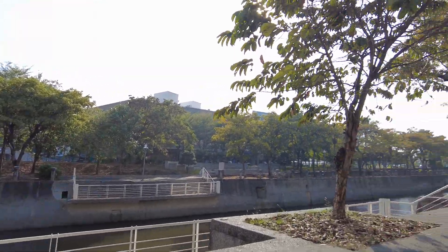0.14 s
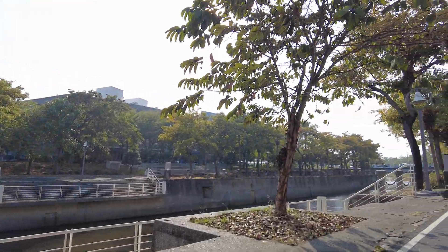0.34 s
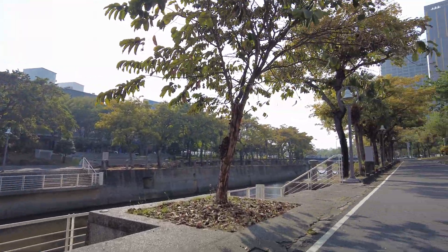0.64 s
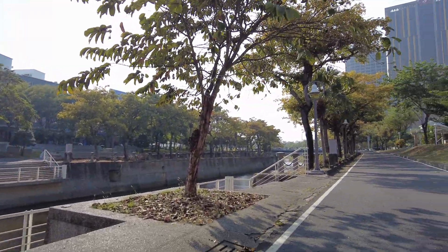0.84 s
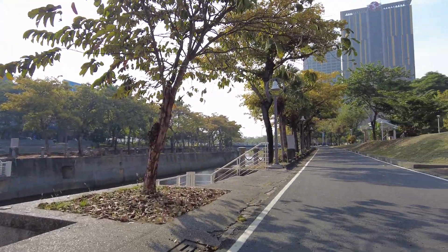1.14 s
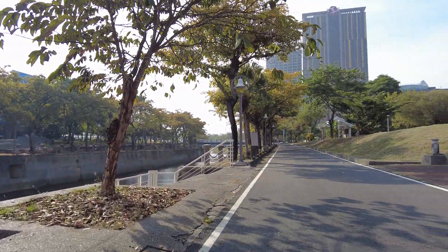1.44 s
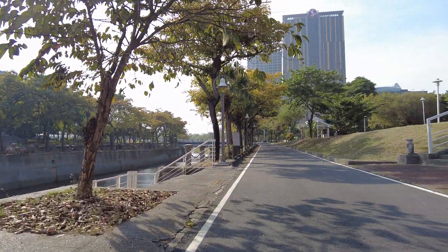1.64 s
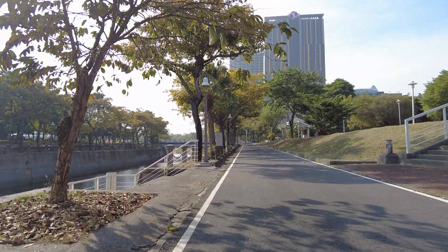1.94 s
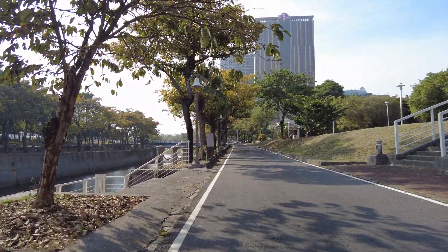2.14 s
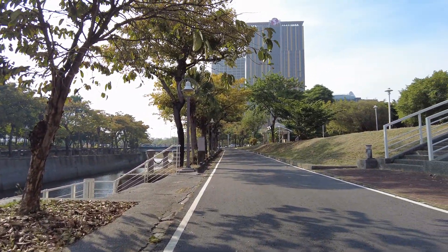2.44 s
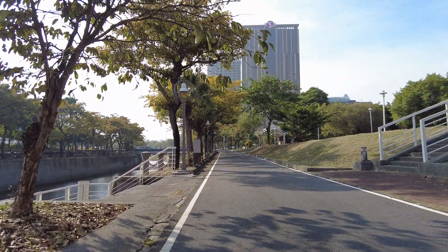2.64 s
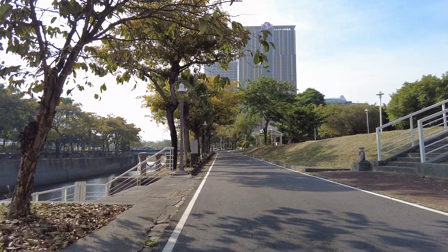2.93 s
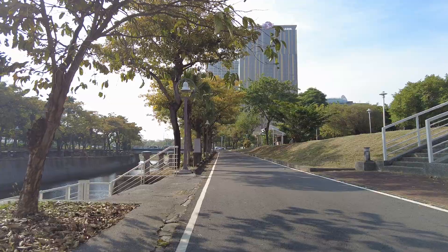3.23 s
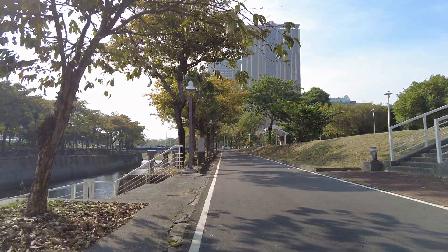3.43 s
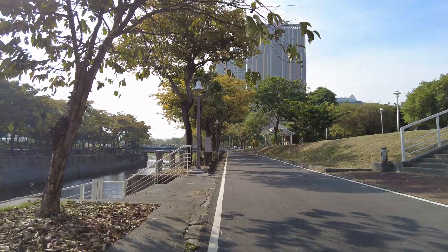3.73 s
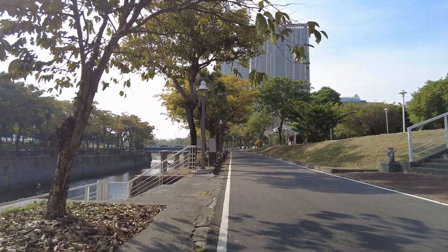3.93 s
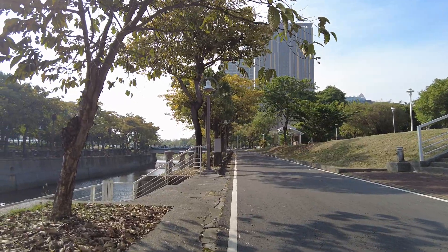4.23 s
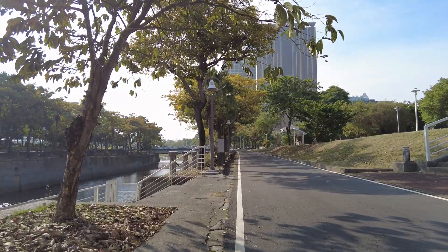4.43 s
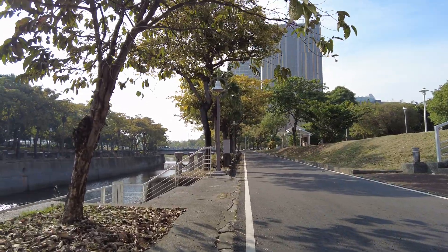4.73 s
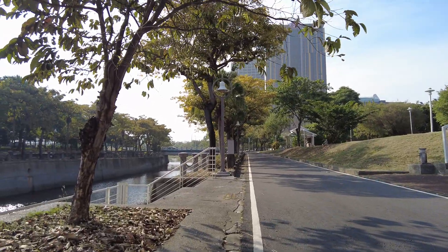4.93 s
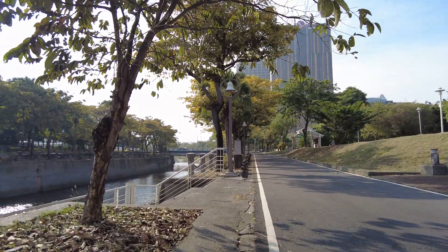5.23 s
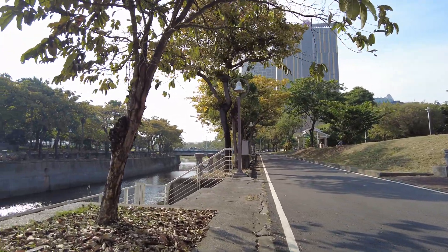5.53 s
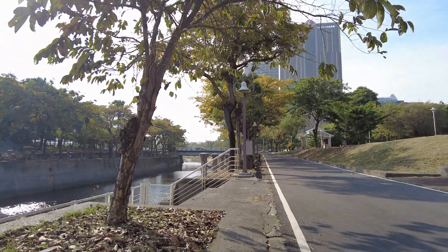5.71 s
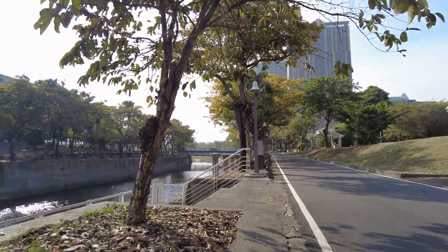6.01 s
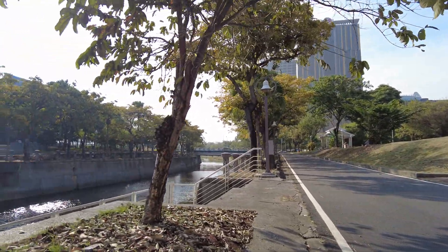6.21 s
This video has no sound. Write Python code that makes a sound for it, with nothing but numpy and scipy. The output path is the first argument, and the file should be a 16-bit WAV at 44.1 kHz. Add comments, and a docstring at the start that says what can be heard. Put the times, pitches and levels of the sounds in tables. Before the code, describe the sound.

Gusty wind rumbles and thumps on the microphone outdoors, strongest in the first second, over soft distant traffic roar and faint small bird chirps.

```python
"""A riverside path in a gusty breeze. Eddies buffet the microphone: shaped noise makes a lumpy rumble, short
swings make single thumps. Small birds chirp in the trees as gliding sines with echoes, over faint far calls.
Dry things tick and crunch nearby as decaying noise bursts. Behind lie traffic drone, rolling tyres, the roar
of the town and a hiss of leaves, each steady noise with its own spectrum and slow level curve."""
import sys
import numpy as np
from scipy import signal
from scipy.fft import rfft, irfft
from scipy.io import wavfile
from scipy.ndimage import uniform_filter1d

SR = 44100
rng = np.random.default_rng(int(sys.argv[2]) if len(sys.argv) > 2 else 0)


def waveform_to_disk(signal):
    """Save audio, clipped to [-1, 1], as 16-bit WAV at the path in sys.argv[1]."""
    frames = np.transpose(np.atleast_2d(signal))
    scaled = np.clip(frames, -1, 1) * 32767
    samples = np.round(scaled).astype(np.int16)
    wavfile.write(sys.argv[1], SR, samples)


N = 280869


def gain_of(db):
    """Decibels to amplitude gain."""
    return 10 ** (np.asarray(db) / 20)


def evened(x):
    """Scales to an rms of one."""
    return x / np.sqrt(np.mean(x ** 2) + 1e-20)


def read(points, hz):
    """Interpolates a table on a log-frequency axis."""
    f, value = np.transpose(points)
    return np.interp(np.log(hz + 1), np.log(f + 1), value)


def curve(table, count):
    """Gain along time from dB column number count."""
    rows = np.transpose(table)
    return gain_of(np.interp(np.arange(N) / SR, rows[0], rows[count]))


def add(mix, s, sound):
    """Mixes a stereo sound in at s seconds."""
    part = mix[:, round(s * SR):][:, :sound.shape[1]]
    part += sound[:, :part.shape[1]]


def noise(spectrum, patchy_db, flicker_db, size=1024):
    """Partly correlated stereo noise with drifting spectral patches and a flicker shared by all pitches."""
    # left-right correlation: (frequency [Hz], correlation [-1 to 1])
    likeness = [(40, .997), (90, .982), (170, .94), (260, .9), (430, .8), (600, .52), (775, .47), (950, .1),
                (1120, -.2), (1290, .72), (1800, .63), (2300, .27), (3000, 0), (3400, -.13), (6200, -.12),
                (9000, .05), (15000, .1)]
    # channel balance: (frequency [Hz], left over right [dB])
    balance = [(300, 0), (1120, 2.2), (1400, -.7), (5000, -1.4), (7500, .4), (11000, 1.5), (15000, .2)]
    frames, hz = 4 * N // size + 5, np.fft.rfftfreq(size, 1 / SR)
    a, b, c, d, patches = rng.standard_normal((frames, len(hz), 5), dtype=np.float32).T
    patches = uniform_filter1d(patches, size=9, axis=0)  # across frequency
    patches = evened(uniform_filter1d(patches, size=10, axis=1))  # along time
    flicker = evened(uniform_filter1d(rng.standard_normal(frames), size=4))

    same = np.clip(read(likeness, hz), -1, 1)[:, None]
    left = a + 1j * b
    right = same * left + np.sqrt(1 - same ** 2) * (c + 1j * d)
    side = gain_of(read(balance, hz) / 2)[:, None]
    level_db = read(spectrum, hz)[:, None] + patchy_db * patches + flicker_db * flicker
    z = np.array([left * side, right / side]) * gain_of(level_db)
    return evened(signal.istft(z, nperseg=size, noverlap=3 * size // 4)[1][:, :N])


def buffeting():
    """Wind pressure noise: big slow eddies make the deep rumble, small quick ones the upper rumble."""
    # wind level before the lumps: (time [s], deep rumble [dB], upper rumble [dB])
    gusts = [(0, -32, -37), (.075, -35, -35), (.26, -34, -38), (.55, -32, -40), (.74, -35, -39),
             (.81, -43, -44), (1.04, -36, -38), (1.33, -45, -43.5), (1.74, -41.5, -48.5),
             (1.87, -34, -42.5), (2.07, -42, -45), (2.33, -41.5, -47), (2.75, -39.5, -44.5),
             (2.97, -39.5, -48), (3.08, -37, -47.5), (3.36, -45, -44.5), (3.69, -37, -44.5),
             (3.8, -38, -45), (4.18, -40.5, -43), (4.6, -40.5, -46), (5.25, -43.5, -46), (5.75, -42.5, -48),
             (5.96, -42.5, -39.5), (6.37, -45.5, -48)]
    # big slow eddies: (frequency [Hz], relative density [dB per Hz])
    deep_spectrum = [(5, 1), (11, 6.5), (22, -6.5), (43, 8), (56, 4.5), (70, -3.5), (100, -32.5),
                     (200, -130)]
    # small quick eddies: (frequency [Hz], relative density [dB per Hz])
    sharp_spectrum = [(30, -60), (55, -18), (75, 7.5), (100, -1), (130, -7.5), (170, -13.5), (250, -22),
                      (500, -72), (1000, -130)]
    lumps_db, lump_s = 2, 0.014  # rms level swing, smoothing window
    deep = noise(deep_spectrum, 0.72, 0.63, size=4096)
    sharp = noise(sharp_spectrum, 1.0, 1.76, size=2048)
    window = np.hanning(round(lump_s * SR))
    lumps = evened(signal.oaconvolve(rng.standard_normal(N), window, "same"))
    rumble = curve(gusts, count=1) * deep + curve(gusts, count=2) * sharp
    return gain_of(lumps_db * lumps) * rumble


def thumps():
    """Each large eddy pushes both channels alike through a swing or two of sagging pitch."""
    # single large eddies: (middle [s], envelope peak [dB], mid pitch [Hz])
    eddies = [(0.057, -20.5, 100), (.074, -17.5, 50), (.103, -23.5, 56), (.255, -23.5, 55), (.288, -23, 48),
              (.413, -22.5, 52), (.652, -19.5, 49.7), (.685, -25, 65), (.96, -26, 62), (1.015, -24, 58),
              (1.055, -23.5, 45.2), (1.178, -27.5, 52)]
    swings, sag = 1.82, 0.24  # pitch runs from this share above to this share below its middle
    out = np.zeros((2, N))
    for (s, db, hz), phase_turns in zip(eddies, rng.random(len(eddies))):
        u = np.linspace(0, 1, round(swings / hz * SR))
        turns = swings * (u + sag * u * (1 - u)) + phase_turns
        swing = np.cos(2 * np.pi * turns) * np.sin(np.pi * u) ** 2
        add(out, s - len(u) / 2 / SR, np.array([swing, swing]) * gain_of(db))
    return out


def birds():
    """Gliding sine whistles that waver and flutter, blurred by echoes off trees and walls."""
    # clear notes: (start [s], length [s], first pitch [Hz], last pitch [Hz],
    # arch above the straight glide [Hz], level before flutter [dB])
    chirps = [(0.29, 0.055, 2584, 3160, 2, -58.5), (0.924, 0.033, 3260, 3230, 0, -60),
              (0.96, 0.041, 2335, 2290, -3, -57), (1.09, 0.039, 2630, 2790, 0, -53.5),
              (1.202, 0.12, 3180, 2990, 1.5, -64.5), (1.31, 0.022, 4800, 5700, 300, -63),
              (1.332, 0.049, 5630, 4650, 477, -62), (1.772, 0.025, 2780, 2470, 0, -49),
              (1.846, 0.043, 3600, 3760, 62, -67), (1.991, 0.03, 2740, 2525, -20, -49),
              (2.025, 0.028, 2420, 2300, 0, -61), (2.38, 0.055, 3430, 2730, 301, -60),
              (2.672, 0.034, 5390, 5280, 3, -59), (2.707, 0.035, 3040, 3150, 0, -63),
              (2.867, 0.063, 3400, 2690, 198, -62), (3.26, 0.042, 3500, 3110, -4, -62),
              (3.437, 0.072, 3190, 3130, 35, -60), (3.58, 0.035, 3200, 3080, 7, -65),
              (3.677, 0.049, 3230, 3230, 0, -68), (3.87, 0.06, 3250, 3240, -1, -66),
              (4.198, 0.046, 2910, 2614, -6, -54), (4.84, 0.027, 2530, 2140, 0, -56.5),
              (3.93, 0.07, 5400, 5200, 0, -75), (5.17, 0.09, 5190, 5100, 0, -72),
              (5.167, 0.1, 6280, 6230, 0, -74), (5.85, 0.14, 6080, 5650, 102, -74),
              (6.165, 0.027, 2560, 2400, 0, -57), (6.26, 0.042, 3750, 3110, -6, -63)]
    # hoarse, fluttering calls from further off: columns as for the chirps
    warbles = [(0.179, 0.06, 4200, 4215, -1, -61), (0.49, 0.07, 5570, 5450, 2, -69),
               (1.145, 0.051, 4700, 4900, 500, -66.5), (1.19, 0.045, 4490, 4400, 0, -65),
               (1.385, 0.028, 4800, 5300, 98, -65), (1.39, 0.09, 4270, 4180, -2, -72),
               (2.11, 0.029, 4500, 4350, 0, -67), (2.44, 0.087, 4450, 4400, 0, -69),
               (2.72, 0.099, 5400, 5500, 0, -69), (2.875, 0.045, 4400, 4450, 0, -70),
               (5.14, 0.025, 5250, 5350, 0, -69)]
    clear, hoarse = (.005, 2.6), (.028, 4.5)  # (pitch waver [share], flutter [dB])
    edge_s, arch_lean = 0.0043, 0.73  # note rise and fall; a lean below 1 peaks the arch early
    pan_db, note_rise_db = -1.5, 1  # left over right; level gained along each note
    lag_rad = 1.4  # left channel behind right
    echo_db, echo_t60_s, echo_delay_s = -6, 0.35, .008

    out = np.zeros((2, N))
    notes = [*(r + clear for r in chirps), *(r + hoarse for r in warbles + twitter())]
    for s, length_s, first_hz, last_hz, arch_hz, db, waver_share, flutter_db in notes:
        u = np.linspace(0, 1, round(length_s * SR))
        drift = uniform_filter1d(rng.standard_normal((2, len(u))), size=140, axis=1)
        waver, flutter = evened(signal.detrend(drift))
        glide_hz = first_hz + (last_hz - first_hz) * u + arch_hz * np.sin(np.pi * u ** arch_lean)
        waver_factor = 1 + waver_share * waver + .00006 * waver / length_s  # short notes waver more
        phase = 2 * np.pi * np.cumsum(glide_hz * waver_factor) / SR
        pair = np.sin(phase + np.array([[-lag_rad], [0]]))
        pair = pair * gain_of([[db + pan_db / 2], [db - pan_db / 2]])
        edges = np.clip(np.minimum(u, 1 - u) * length_s / edge_s, 0, 1)
        add(out, s, pair * gain_of(flutter_db * flutter + note_rise_db * u) * edges)

    t = np.arange(SR // 2) / SR
    echoes = rng.standard_normal((2, len(t))) * gain_of(-60 * t / echo_t60_s) * (t > echo_delay_s)
    echoes = echoes / np.linalg.norm(echoes[0])
    return out + gain_of(echo_db) * signal.fftconvolve(out, echoes, axes=1)[:, :N]


def twitter(count=130):
    """Chirp rows for a faint crowd of far birds: random moments, pitches and slides."""
    s, high, slide, loud = rng.random((count, 4)).T
    hz = 2400 * 2.4 ** high ** 1.4
    db = -65 - 9 * high - 5 * loud  # air dulls the higher calls
    return [(a * N / SR, .04, f, f * (1.1 - .3 * g), 0, d) for a, f, g, d in zip(s, hz, slide, db)]


def ticks():
    """Short dry decaying noise bursts in the treble, as of leaves or grit."""
    # (start [s], level before decay [dB], highest treble over lower treble [dB])
    bursts = [(0.1994, -66.5, -7), (0.4094, -68.5, 3), (0.5294, -69, 1), (0.852, -67, -10),
              (1.0094, -68, -3), (1.3194, -72.5, 3), (1.7145, -70, -9), (1.7639, -70, -4),
              (1.9699, -67, -2), (2.2932, -64, 3), (2.7194, -71.5, 3), (2.8434, -69, -11),
              (3.0294, -71.5, 8), (3.6656, -73, -2)]
    attack_s, t60_s = 0.0023, 0.13
    out, t = np.zeros((2, N)), np.arange(2048) / SR
    hz = np.fft.rfftfreq(len(t), 1 / SR)
    for s, db, tilt_db in bursts:
        points = [(4000, -30), (7000, -tilt_db / 2), (9000, -tilt_db / 2), (12000, tilt_db / 2)]
        colour = gain_of(read(points, hz))
        burst = irfft(rfft(rng.standard_normal((2, len(t)))) * colour)
        add(out, s, evened(burst) * gain_of(db - 60 * t / t60_s) * np.minimum(t / attack_s, 1))
    return out


def crunch():
    """Runs of snaps ringing in a dry hollow body, uneven in time, strength and pitch."""
    # three crackles, then a duller knock:
    # (start [s], length [s], nominal level of first snap before decay [dB], pitch factor on the body)
    crackles = [(2.2, .005, -38.5, 0.93), (2.209, .018, -37.5, 1), (2.234, .009, -39.5, 0.95),
                (3.46, .013, -35, 0.66)]
    # body resonance before the pitch factor: (frequency [Hz], relative level [dB])
    body = [(300, -22), (600, -5), (1000, -8), (1350, -1), (1800, -3), (2300, -12), (3000, -11),
            (4700, -24), (15500, -57)]
    gap_s, run_fade_db_per_s = .004, 420  # mean snap spacing; later snaps of a run are weaker
    t60_s = .02
    out, t = np.zeros((2, N)), np.arange(1024) / SR
    hz = np.fft.rfftfreq(len(t), 1 / SR)
    for s, length_s, db, pitch in crackles:
        for at in np.arange(0, length_s + 1e-6, gap_s):
            late, loud, high = rng.uniform(-1, 1, size=3)
            colour = gain_of(read(body, hz / (pitch * (1 + 0.069 * high))))
            a, b = irfft(rfft(rng.standard_normal((2, len(t)))) * colour)
            pair = evened(np.array([a, .6 * a + .8 * b]))  # channels correlate by 0.6
            decay = gain_of(db - run_fade_db_per_s * at + 2.5 * loud - 60 * t / t60_s)
            attack = np.minimum(t / .0008 * pitch ** 4, 1)  # lower pitch starts softer
            jitter_s = .3 * late * min(at, gap_s)  # none on the first snap
            add(out, s + at + jitter_s, pair * (decay * attack))
    return out


def distance():
    """Shaped noise for traffic drone, rolling tyres, the roar of the town and the hiss of leaves."""
    # levels before the dips: (time [s], tyres [dB], town roar [dB], leaf hiss [dB], low traffic [dB])
    far = [(0, -58.5, -53, -65.5, -47), (.3, -58, -54.5, -65.5, -50.5), (1, -58, -54.5, -65.5, -48),
           (1.75, -57, -55.5, -69, -50), (2.2, -58.5, -54, -67, -49.5), (3.3, -57.5, -55.5, -68.5, -49.5),
           (3.7, -55, -56, -69.5, -48.5), (4.1, -59, -55, -69, -49.5), (5.2, -57, -55, -69, -48),
           (6.37, -56, -55.5, -68.5, -49.5)]
    # low traffic: (frequency [Hz], relative density [dB per Hz])
    drone_spectrum = [(60, -67), (110, -10.5), (150, -3.5), (195, 4), (240, -7.5), (300, -7.5), (420, -10),
                      (520, -17), (800, -41), (1500, -110)]
    # rolling tyres: (frequency [Hz], relative density [dB per Hz])
    roll_spectrum = [(350, -36), (520, -6.5), (612, -5), (817, 0), (1050, -3.5), (1250, -22.5),
                     (2500, -110)]
    # roar of the town, with a faint steady line of far bird calls near 3.2 kHz: (frequency [Hz], relative
    # density [dB per Hz])
    roar_spectrum = [(700, -67), (1100, -3), (1250, -0.5), (1560, -1), (2020, -7), (2900, -8.5),
                     (3230, -7.5), (3450, -14), (4600, -19), (5500, -69), (9000, -120)]
    # hiss of leaves: (frequency [Hz], relative density [dB per Hz])
    hiss_spectrum = [(2500, -47), (3600, -7), (4500, -5.5), (6200, -9.5), (6900, -15.5), (7800, -15),
                     (10100, -23), (12800, -26), (15600, -29.5)]
    drone = curve(far, count=4) * noise(drone_spectrum, 1.33, 0.63)
    tyres = curve(far, count=1) * dips(count=2) * noise(roll_spectrum, 2.17, 0.95)
    roar = curve(far, count=2) * dips(count=3) * noise(roar_spectrum, 0.75, 0.13)
    leaves = curve(far, count=3) * noise(hiss_spectrum, 1.0, 0.64)
    return drone + tyres + roar + leaves


def dips(count):
    """Gain along time that sinks briefly for each dip, by dB column number count, with soft edges."""
    # brief dips of the far sounds: (start [s], length [s], tyres [dB], town roar [dB])
    dip_rows = [(0.21, 0.03, -1, -5.5), (0.527, 0.038, -5, -2), (1.004, 0.067, -8, -2),
                (1.012, 0.34, -2, -3.5)]
    edge_s = 0.01
    t = np.arange(N) / SR
    total_db = np.zeros(N)
    for row in dip_rows:
        inside_s = np.minimum(t - row[0], row[0] + row[1] - t)
        total_db += row[count] * np.clip(inside_s / edge_s + .5, 0, 1)
    return gain_of(total_db)


def scene():
    """Sums all sources at the microphone."""
    return buffeting() + thumps() + birds() + ticks() + crunch() + distance()


def record(dry):
    """Band limit of the recorder: a steep linear-phase low-pass."""
    edge_hz = 15720
    lowpass = signal.firwin(511, edge_hz, window=("kaiser", 9), fs=SR)
    return signal.oaconvolve(dry, lowpass[None], "same")


dry = scene()
out = record(dry)
waveform_to_disk(out)
```